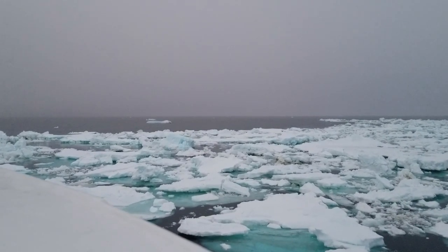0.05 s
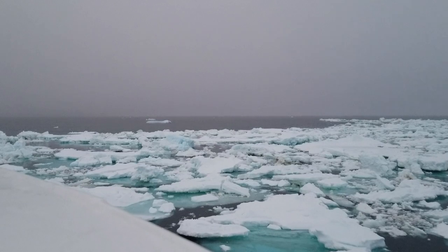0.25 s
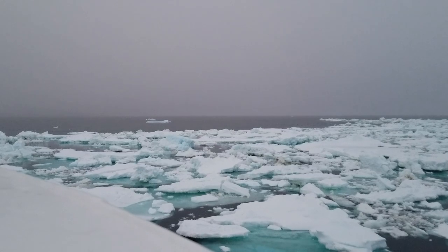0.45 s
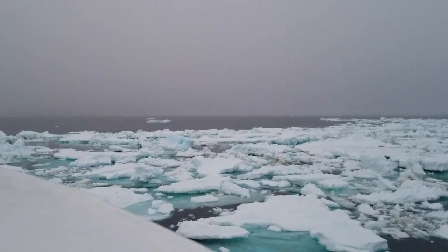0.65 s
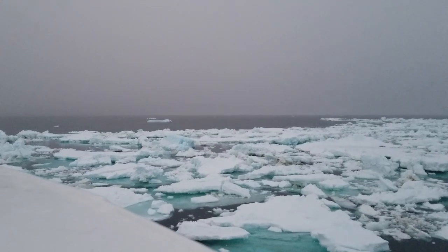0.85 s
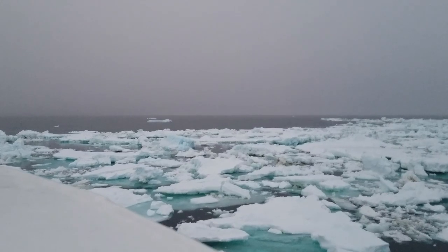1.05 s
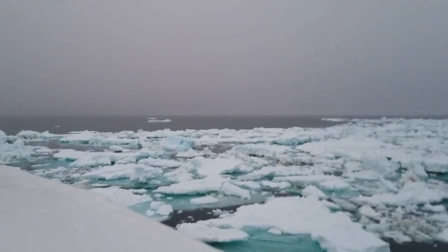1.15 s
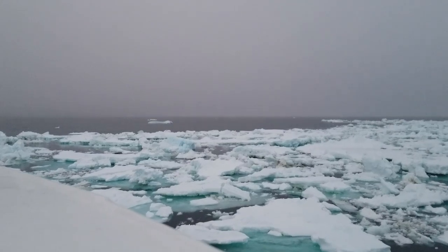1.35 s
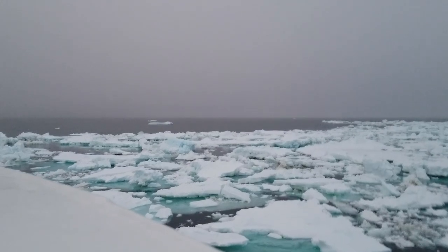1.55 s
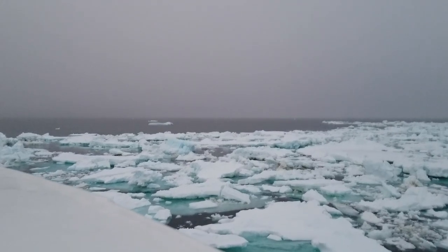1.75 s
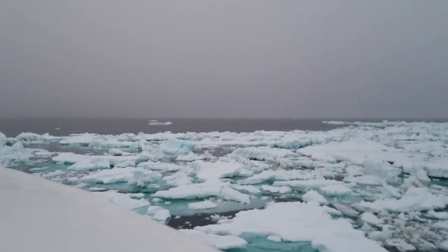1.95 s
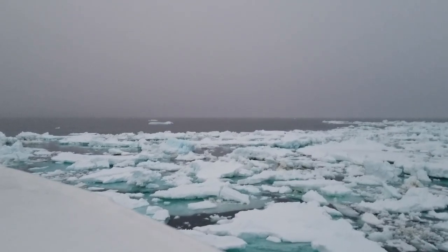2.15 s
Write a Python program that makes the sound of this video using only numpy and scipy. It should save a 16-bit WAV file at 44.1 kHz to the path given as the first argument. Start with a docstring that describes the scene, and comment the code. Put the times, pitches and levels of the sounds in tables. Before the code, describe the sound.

A gust of wind swells quickly on the microphone with deep buffeting and a thin hiss, then ebbs in lumps. Behind it a ship rumbles faintly, water washes softly along the hull and ice gives a few faint ticks.

```python
"""Water washes softly along the hull on the right as a ship moves slowly through broken ice.
Over the ship's faint rumble a gust swells quickly, buffets the microphone and ebbs in lumps.
The gust is layered noise: deep buffeting, a boom that rings once as a hum, a hollow roar, thuds of
single eddies and a thin, whistling hiss off the ship's edges.
A few faint ticks and short fizzing crunches, probably ice, sit on top."""
import sys
import numpy as np
from scipy import signal
from scipy.fft import rfft, irfft, next_fast_len
from scipy.io import wavfile
from scipy.ndimage import uniform_filter1d, map_coordinates

SR = 44100
rng = np.random.default_rng(int(sys.argv[2]) if len(sys.argv) > 2 else 0)


def int16_out(signal):
    """Quantize to a 16-bit WAV file."""
    q = np.round(np.clip(np.atleast_2d(signal).T, -1, 1) * 32767)
    wavfile.write(sys.argv[1], SR, q.astype(np.int16))


N = 97020

# Fader rides for the water and for each layer of the gust: t/s, level/dB
WASH_RIDE = [(0, -65), (.3, -62.5), (.65, -62), (.8, -71), (1.3, -69.5), (1.52, -74), (1.7, -73.5),
             (1.85, -74.5), (1.96, -67.5), (2.1, -74.5), (2.2, -72.5)]
FIZZ_RIDE = [(0, -80), (.15, -80), (.3, -78.5), (.48, -80), (.55, -83.5), (.72, -89), (.78, -87),
             (1.3, -86), (1.7, -89), (2.2, -88.5)]
AIR_RIDE = [(.25, -75), (.36, -86), (.48, -71), (.55, -92), (.61, -71), (.68, -86), (.78, -100)]
HISS_RIDE = [(0, -87), (.17, -80), (.27, -63.5), (.36, -66), (.5, -62), (.66, -62.5), (.78, -65),
             (.95, -70), (1.25, -70), (1.55, -75), (2.2, -69.5)]
BUFFET_RIDE = [(0.16, -70.5), (0.28, -41.5), (0.41, -52.5), (0.48, -46), (0.74, -46.5), (0.94, -54),
               (1.07, -48.5), (1.11, -54), (1.31, -56.5), (1.45, -55.5), (1.51, -65), (1.58, -54.5),
               (1.87, -62.5), (2.12, -80.5), (2.2, -45.5)]
BOOM_RIDE = [(0.16, -73), (0.19, -59.5), (0.27, -46.5), (0.57, -43.5), (0.64, -41), (0.72, -48.5),
             (0.77, -37.5), (0.81, -43), (0.93, -47.5), (1.0, -44), (1.04, -50.5), (1.15, -48),
             (1.47, -53.5), (1.52, -66.5), (1.63, -49.5), (1.7, -55.5), (1.9, -56.5), (2.2, -57.5)]
ROAR_RIDE = [(0.16, -74.5), (0.22, -51), (0.3, -45.5), (0.36, -47.5), (0.47, -41.5), (0.61, -45.5),
             (0.71, -42.5), (0.77, -46), (1.37, -56.5), (1.76, -57.5), (1.82, -63), (1.99, -59), (2.2, -64)]
# Tone colour of each noise layer: f/Hz, relative level/dB
RUMBLE_EQ = [(15, -16), (38, -2), (85, 3), (130, -13), (200, -25.5), (600, -40.5), (2000, -94)]
WASH_EQ = [(40, -5), (90, -6.5), (180, -12.5), (400, 2.5), (750, 3), (1000, 0.5), (1450, 1), (2200, -4),
           (3400, -11.5), (4300, -12.5), (6000, -27), (12000, -39), (16000, -42)]
FIZZ_EQ = [(1500, -44), (4000, 11), (6000, 12.5), (8500, 8), (12000, 10), (14000, 0.5), (15500, -30)]
CRUNCH_EQ = [(500, -63), (1300, 13.5), (2200, 8.5), (3200, -2), (4300, -8.5), (6000, -19), (12000, -23),
             (15500, -28)]
AIR_EQ = [(2200, -27.5), (3420, -7), (3590, 9), (3800, -6), (4230, -14), (4370, 7), (4560, -11),
          (6500, -19.5)]
HISS_EQ = [(300, -27), (600, 7), (900, -2.5), (1080, -1.5), (1600, -6), (2200, -14), (3100, -21),
           (4200, -25.5), (5500, -35.5), (9000, -34), (15000, -49)]
BUFFET_EQ = [(15, -33), (30, -22), (48, -10), (60, -4), (74, 2.5), (88, -12), (120, -4.5), (300, -53),
             (900, -76)]
BOOM_EQ = [(60, -41.5), (90, -0.5), (124, 7.5), (145, -3.5), (200, -1), (240, -16.5), (400, -37),
           (900, -110)]
ROAR_EQ = [(120, -30.5), (200, 1), (270, 0.5), (340, 0.5), (490, -2), (550, -10.5), (640, -12.5),
           (770, -17.5), (820, -16), (900, -18.5), (1050, -30), (1600, -44.5), (4000, -89)]
# Stereo images: f/Hz, left-right correlation (1 is narrow, 0 is wide)
WASH_IMAGE = [(100, 0.35), (400, 1), (650, 0.46), (1300, 0.92), (2500, 0.32), (4500, 0.44), (9000, 0.086)]
FIZZ_IMAGE = [(3000, 0.244), (10000, 0.067)]
HISS_IMAGE = [(500, 0.23), (1200, -0.15), (3000, 0.043), (8000, 0.56)]
WIND_IMAGE = [(50, 0.91), (160, 0.97), (300, 0.79), (480, 0.77), (650, 0.83), (900, 0), (3000, 0)]
# Resonances the wind excites, high whistles and low hollows: f/Hz, half width/Hz, relative level/dB
WHISTLE_PEAKS = [(1139, 17, 0.5), (1226, 11, 0.5), (1403, 43, 3), (1674, 20, 0.5), (1982, 8.9, 2)]
HOLLOW_PEAKS = [(281.5, 11.5, 0), (418.6, 5.65, 1.5), (499.2, 3.9, -6), (745, 8, -17), (910, 11, -17.5)]
# Fizzing crunches: crest t/s, half length/s, level/dB, tilt/(dB per octave), left over right/dB
CRUNCH_CUES = [(0.729, 0.015, -69, 4.5, 7.5), (0.886, 0.013, -67, 4, 2), (1.117, 0.0094, -71, 6, 12),
               (1.95, 0.021, -74, 4.5, -2)]
# Dry ticks: t/s, peak level/dB, f/Hz, left over right/dB
TICK_CUES = [(.8645, -48, 2000, 8), (.937, -54, 2400, 4), (1.104, -56, 2300, 5), (1.141, -59, 7000, 7),
             (1.746, -61, 4000, 0)]
# The boom's single ring: crest t/s, half length/s, level/dB, f/Hz
HUM_CUE = (.851, .019, -39.5, 119)
# Eddies hitting the microphone: crest t/s, half length/s, level/dB, centre f/Hz
PUFF_CUES = [(0.486, 0.028, -39, 72), (0.568, 0.021, -40, 72), (0.752, 0.025, -45, 75),
             (1.214, 0.013, -43, 137), (1.669, 0.0064, -45.5, 145), (1.749, 0.0071, -48.5, 120),
             (1.774, 0.0019, -45, 236), (1.796, 0.0023, -45, 304), (1.828, 0.0051, -55.5, 396),
             (1.867, 0.0057, -49, 326), (1.94, 0.0036, -43.5, 153), (1.974, 0.0074, -50, 130),
             (2.066, 0.0034, -46.5, 148)]

WASH_LAG_MS, WIND_LAG_MS, HISS_LAG_MS = 0.437, -0.15, -0.413  # left ear behind the right
BUFFET_TRIM_DB, ROAR_TRIM_DB = -0.5, 1.5
BUFFET_PAN_DB, BOOM_PAN_DB, ROAR_PAN_DB = 1.7, 2.5, 1.5  # left over right
RUMBLE_DB = -69
WHISTLE_DB, HOLLOW_DB = -4.5, -4.5  # against the hiss at its top; against the roar's broad noise
BOOM_DRIFT, HOLLOW_DRIFT, DRIFTS_PER_S = .06, .004, 9  # pitch wander: two shares and their pace
TICK_CYCLES = 5.2  # cycles of ringing until a tick is 60 dB down
TOP_HZ = 15600


def amp(db):
    """Decibels to gain."""
    return 10 ** (np.asarray(db) / 20)


def unit(x):
    """Scale to rms 1."""
    return x / np.sqrt(np.mean(x ** 2) + 1e-20)


def pan(db):
    """Left and right gains for a level difference; positive leans left."""
    return amp(np.array([[db], [-db]]) / 2)


def ride(points):
    """A fader ride in dB, one value per sample."""
    times, levels = np.transpose(points)
    return np.interp(np.arange(N) / SR, times, levels)


def gust_gain(points):
    """Gain along a ride that rises out of calm air just before its first point."""
    fade_in = np.clip(np.arange(N) / SR / points[0][0], 0, 1) ** 8
    return amp(ride(points)) * fade_in


def swell(crest_s, half_s):
    """A bell-shaped rise and fall around a moment."""
    return np.exp(-.5 * ((np.arange(N) / SR - crest_s) / half_s) ** 2)


def burst(start_s, t60_s):
    """An envelope that snaps up to about half gain and dies away."""
    age = np.arange(N) / SR - start_s
    attack = np.clip(age * SR / 20, 0, 1)
    return .5 * attack * amp(-60 * np.abs(age) / t60_s)


def wobble(rate):
    """A smooth random curve, rate knots a second."""
    knots = rng.standard_normal(int(N * rate / SR) + 4)
    return map_coordinates(knots, [np.arange(N) * rate / SR])


def along(points, hz):
    """Read a curve on a log frequency axis."""
    freqs, values = np.transpose(points)
    return np.interp(np.log(hz + 1), np.log(freqs + 1), values)


def eq(points):
    """Filter response of an EQ curve."""
    return lambda hz: amp(along(points, hz))


def resonances(peaks):
    """Filter response of a set of narrow peaks."""
    return lambda hz: sum(amp(db) / (1 + ((hz - centre) / width) ** 2) for centre, width, db in peaks)


def band(centre_hz, octaves):
    """Filter response of one broad bell."""
    return lambda hz: np.exp(-.5 * (np.log2((hz + 1) / centre_hz) / octaves) ** 2)


def filtered(x, response):
    """Run x through a complex frequency response."""
    size = next_fast_len(N + SR // 2)
    hz = np.fft.rfftfreq(size, 1 / SR)
    return irfft(rfft(x, size) * response(hz), size)[..., :N]


def noise(response, image, lag_ms):
    """Stereo noise of rms 1 with a tone colour, an image and a lag between the sides."""
    def mid_side(hz):
        angle = np.arccos(np.clip(along(image, hz), -1, 1)) / 2
        return response(hz) * [np.cos(angle), np.sin(angle)]

    mid, side = filtered(rng.standard_normal((2, N)), mid_side)
    stereo = np.array([mid + side, mid - side])
    delay_s = np.array([[.5], [-.5]]) * lag_ms / 1000
    return unit(filtered(stereo, lambda hz: np.exp(-2j * np.pi * hz * delay_s)))


def steady(x, samples=2000):
    """Level out a noise's chance swells, so that the fader shapes it."""
    power = uniform_filter1d(np.mean(x ** 2, axis=0), samples)
    return x / np.sqrt(np.abs(power) + 1e-9)


def drift(x, share):
    """Let the pitch of a stereo sound wander by a share of itself."""
    position = np.arange(N) + np.cumsum(share * wobble(DRIFTS_PER_S))
    return np.array([map_coordinates(side, [position], mode="mirror") for side in x])


def ship_rumble():
    """The bed: the vessel's steady, faint rumble."""
    return amp(RUMBLE_DB) * steady(noise(eq(RUMBLE_EQ), image=[(60, 0.38)], lag_ms=0), samples=3000)


def splashes(x, depth_db):
    """Small splashes and bubbles: brief patches of random gain in time and frequency."""
    spectra = signal.stft(x, nperseg=256)[2]
    patches = uniform_filter1d(rng.standard_normal(spectra.shape[1:]), size=3, axis=0)
    patches = unit(uniform_filter1d(patches, size=4, axis=1))
    dappled = signal.istft(spectra * amp(depth_db * patches))[1]
    return unit(dappled[:, :N])


def hull_wash():
    """Water washes along the hull with a fine, flickering fizz, arriving from the right."""
    wash = noise(eq(WASH_EQ), WASH_IMAGE, WASH_LAG_MS)
    fizz = noise(eq(FIZZ_EQ), FIZZ_IMAGE, WASH_LAG_MS)
    wash = amp(ride(WASH_RIDE)) * splashes(wash, depth_db=2.8) * pan(db=-0.5)
    flicker_db = 1.7 * wobble(rate=430)
    return wash + amp(ride(FIZZ_RIDE) + flicker_db) * fizz


def ice_crunches():
    """Short swells of bright, grainy fizz."""
    out = np.zeros((2, N))
    for crest_s, half_s, db, tilt, pan_db in CRUNCH_CUES:
        tilted_eq = lambda hz: amp(along(CRUNCH_EQ, hz) + tilt * np.log2(hz + 1))
        fizz = noise(tilted_eq, FIZZ_IMAGE, WASH_LAG_MS)
        grit_db = 2.2 * wobble(rate=700)
        out += amp(db) * swell(crest_s, half_s) * unit(fizz * amp(grit_db)) * pan(pan_db)
    return out


def ice_ticks():
    """Tiny dry cracks that die within a few cycles, each over a duller, rough burst."""
    out = np.zeros((2, N))
    for start_s, db, hz, pan_db in TICK_CUES:
        cycles = np.maximum(np.arange(N) / SR - start_s, 0) * hz
        snap = amp(db - 60 * cycles / TICK_CYCLES) * np.sin(2 * np.pi * cycles)
        rough = noise(band(.75 * hz, octaves=.7), FIZZ_IMAGE, lag_ms=0)
        body = amp(db - 21) * burst(start_s, t60_s=.02) * rough
        out += (snap + body) * pan(pan_db)
    return out


def gust_air():
    """An airy top end that comes through while the gust is strongest."""
    return gust_gain(AIR_RIDE) * noise(eq(AIR_EQ), HISS_IMAGE, HISS_LAG_MS)


def edge_hiss():
    """The gust hisses over the ship's edges on the left and whistles faintly when it is strongest."""
    hiss_db = ride(HISS_RIDE)
    whistle_gain = amp(WHISTLE_DB + hiss_db - hiss_db.max())
    whistle = whistle_gain * noise(resonances(WHISTLE_PEAKS), HISS_IMAGE, HISS_LAG_MS)
    flutter_db = wobble(rate=120)
    hiss = noise(eq(HISS_EQ), HISS_IMAGE, HISS_LAG_MS)
    return amp(hiss_db + flutter_db) * (hiss + whistle)


def boom_hum():
    """The boom rings briefly on one low pitch as the gust passes its top."""
    crest_s, half_s, db, hz = HUM_CUE
    tone = np.sqrt(2) * np.sin(2 * np.pi * (hz * np.arange(N) / SR + rng.random()))
    return amp(db) * swell(crest_s, half_s) * tone * pan(BOOM_PAN_DB)


def eddy_puffs():
    """Single eddies thud on the microphone: long and deep in the gust, short flutters as it ebbs."""
    out = np.zeros((2, N))
    for crest_s, half_s, db, hz in PUFF_CUES:
        envelope = swell(crest_s, half_s)
        thud = envelope * noise(band(hz, octaves=0.42), WIND_IMAGE, WIND_LAG_MS)
        out += amp(db) * unit(thud) * np.sqrt(np.mean(envelope ** 2))
    return out * pan(BOOM_PAN_DB)


def gust_body():
    """Wind on the microphone: deep buffeting, a boom and a hollow roar, all fluttering with the eddies."""
    blow = lambda response: noise(response, WIND_IMAGE, WIND_LAG_MS)
    buffet = steady(blow(eq(BUFFET_EQ)))
    boom = steady(drift(blow(eq(BOOM_EQ)), BOOM_DRIFT))
    broad = blow(eq(ROAR_EQ))
    hollows = drift(blow(resonances(HOLLOW_PEAKS)), HOLLOW_DRIFT)
    roar = steady(broad + amp(HOLLOW_DB) * hollows)
    eddy_db = wobble(rate=80)
    return (gust_gain(BUFFET_RIDE) * amp(BUFFET_TRIM_DB + eddy_db) * buffet * pan(BUFFET_PAN_DB)
            + gust_gain(BOOM_RIDE) * amp(eddy_db) * boom * pan(BOOM_PAN_DB)
            + gust_gain(ROAR_RIDE) * amp(ROAR_TRIM_DB + 0.89 * eddy_db) * roar * pan(ROAR_PAN_DB))


def scene():
    """The open-air mix: wind up front, with ship, water and ice behind it."""
    wind = gust_body() + eddy_puffs() + boom_hum() + edge_hiss() + gust_air()
    return wind + ship_rumble() + hull_wash() + ice_ticks() + ice_crunches()


def record(dry):
    """A brick-wall low-pass takes off the very top."""
    return filtered(dry, lambda hz: hz < TOP_HZ)


dry = scene()
out = record(dry)
int16_out(out)
```